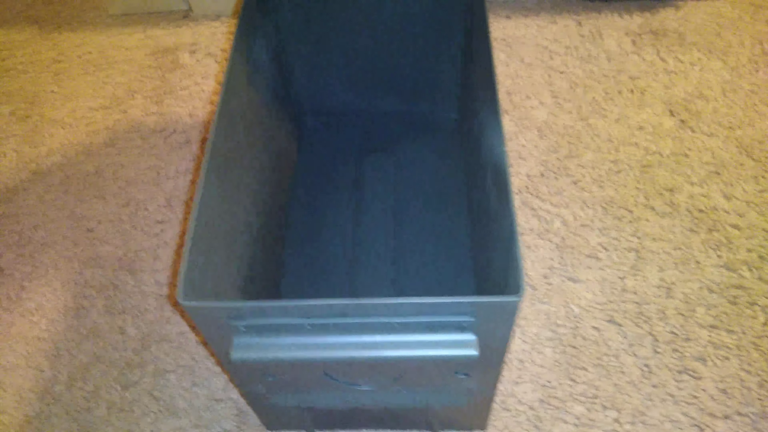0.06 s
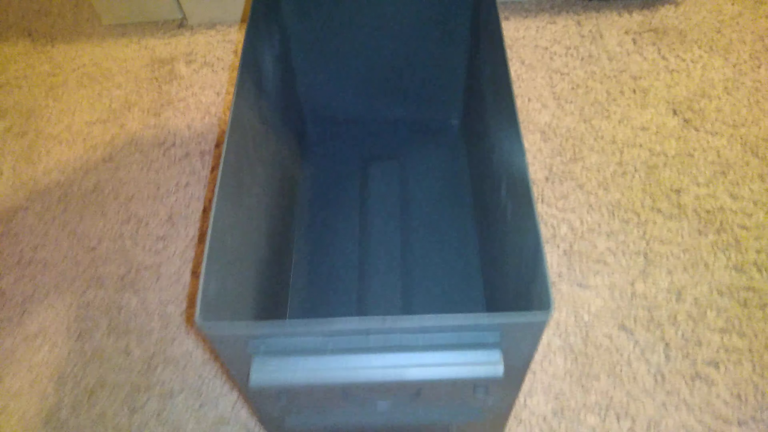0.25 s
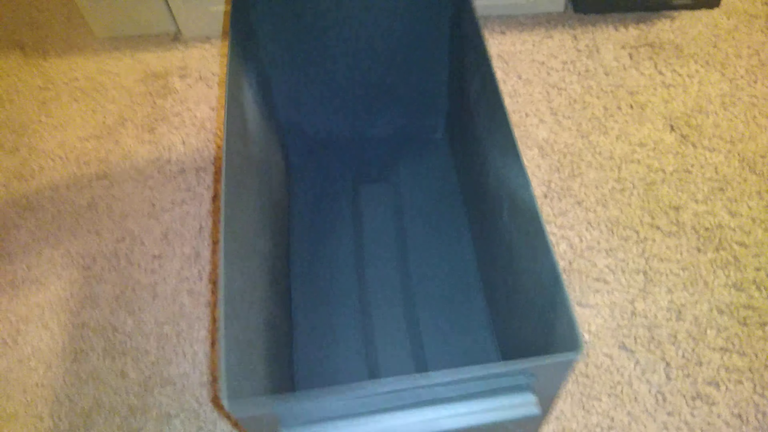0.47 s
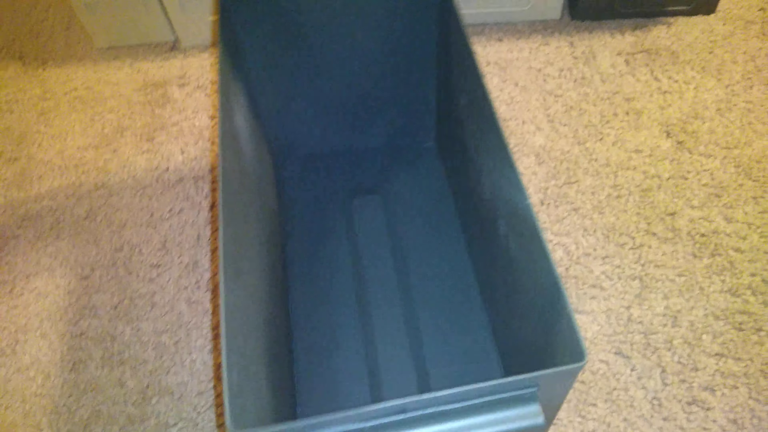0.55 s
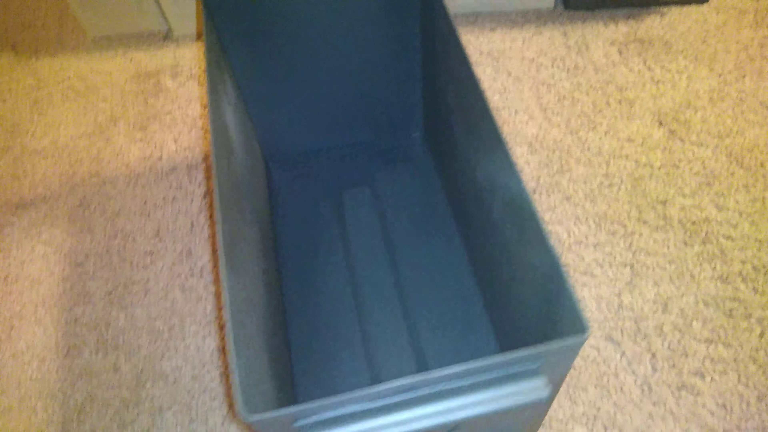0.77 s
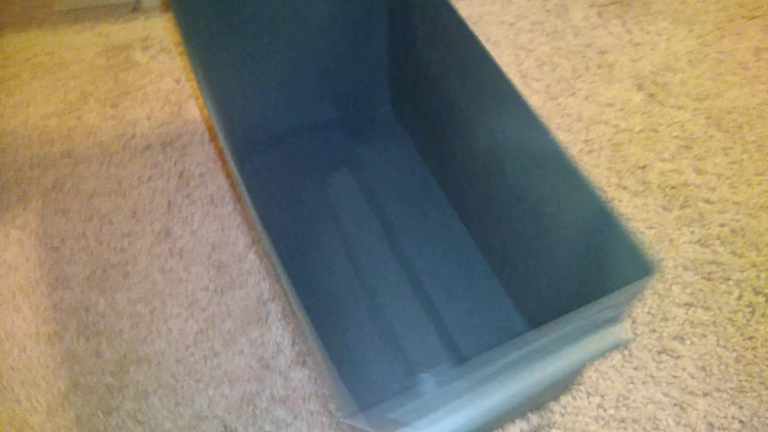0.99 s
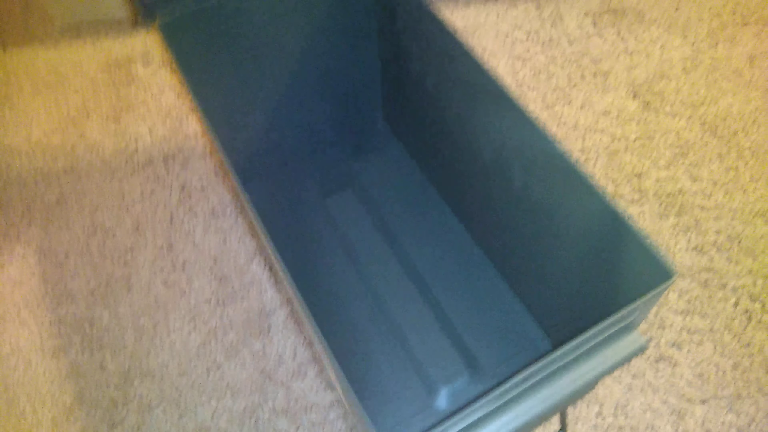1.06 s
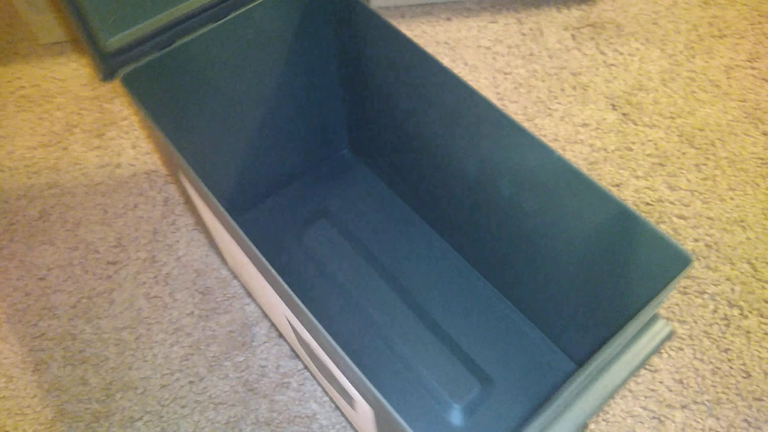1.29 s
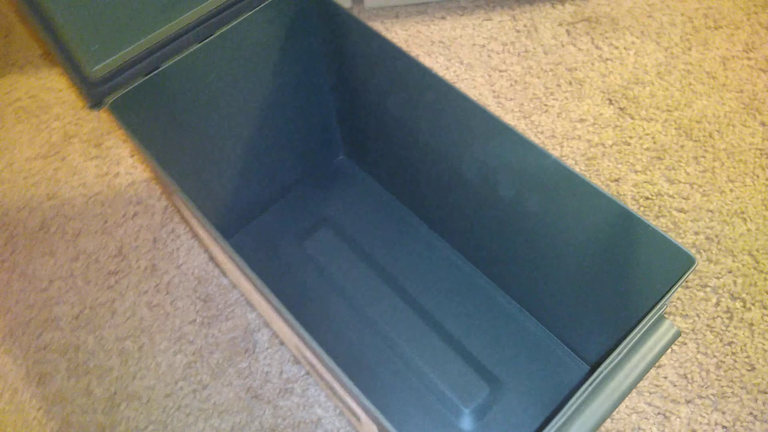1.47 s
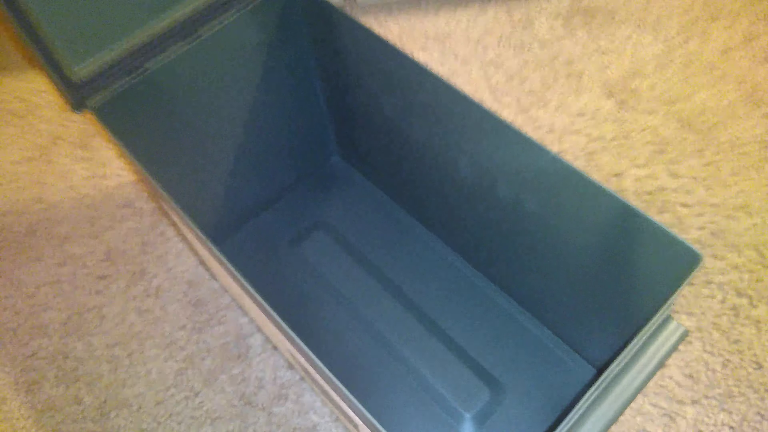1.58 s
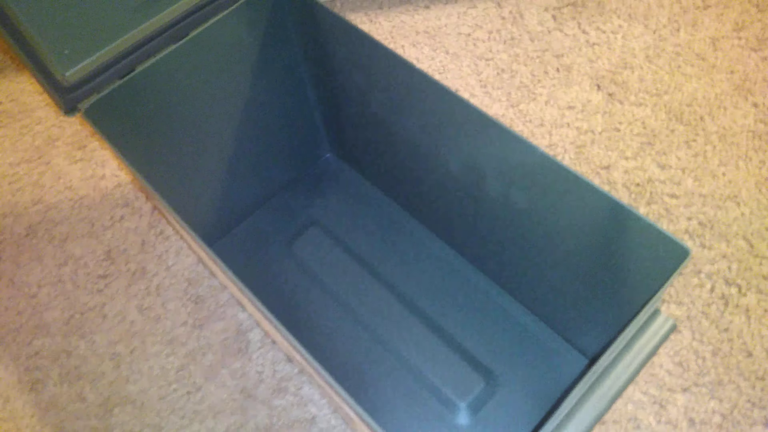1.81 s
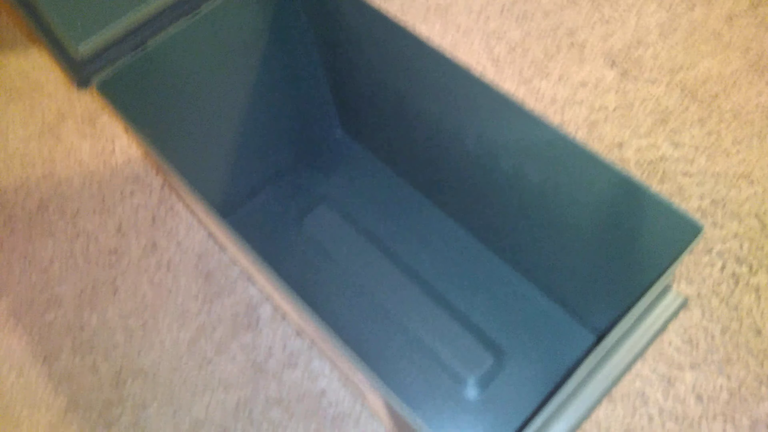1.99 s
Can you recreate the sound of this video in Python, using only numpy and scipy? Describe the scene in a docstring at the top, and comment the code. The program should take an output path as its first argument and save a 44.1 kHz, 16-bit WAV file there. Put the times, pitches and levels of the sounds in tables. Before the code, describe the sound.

An open steel ammunition can clanks and rings, its handle slapping and its lid knocking against the hinge. It then slides round on carpet with a soft hiss, a latch clack and a few dull knocks, close up in a quiet room.

```python
"""An open steel ammunition can is grabbed and swung round on a carpet, close to the microphone.
First it clanks and the handle slaps its stop. Each contact is a short chatter that sets the thin
walls ringing. Just after half a second the lid drops against its hinge, and the base starts to
hiss over the carpet as it turns. From one second on, the latch clacks and the base settles with
a few dull knocks. Under it all lie a soft handling rumble and a quiet room."""
import sys
import numpy as np
from scipy import signal
from scipy.fft import irfft, next_fast_len
from scipy.io import wavfile

SR = 44100
rng = np.random.default_rng(int(sys.argv[2]) if len(sys.argv) > 2 else 0)


def log_audio(samples):
    """Write samples as a 16-bit WAV file to the path given in sys.argv[1]."""
    # one column per channel
    frames = np.atleast_2d(samples).T
    # limit to full scale, then quantise
    limited = np.clip(frames, -1, 1)
    pcm = np.round(limited * 32767).astype(np.int16)
    wavfile.write(sys.argv[1], SR, pcm)


N = 90404

# The contacts. Each row: start in seconds, chatter length in ms, then the strength in dB
# of the bass, low middle, upper middle and treble.
CONTACTS = [ (0.002, 11.1, -45.5, -42.5, -38, -55), (0.0785, 13.7, -38, -42.5, -33, -52),
            (0.104, 9.5, -38.5, -31, -60, -79), (0.140, 21, -45, -64, -42, -79),
            (0.1695, 12.2, -40.5, -37, -37.5, -40.5), (0.2005, 4.8, -33, -23.5, -16, -18.5),
            (0.231, 14, -35, -35, -32, -37), (0.2498, 6.8, -23.5, -23, -13, -22.5),
            (0.289, 11.2, -26.5, -32.5, -20.5, -33), (0.305, 4.7, -50, -21, -34, -40),
            (0.321, 1.9, -29, -24, -20, -36.5), (0.389, 8, -39.5, -38.5, -63, -66),
            (0.4425, 6.5, -38, -39.5, -33, -57.5), (0.5458, 7.6, -29.5, -30.5, -20.5, -38.5),
            (0.616, 13.4, -50.5, -43.5, -30.5, -54.5), (0.762, 6.7, -57, -58, -51.5, -81),
            (1.040, 3.6, -45.5, -44.5, -48, -66), (1.081, 2.74, -53, -40, -35.5, -62),
            (1.167, 4.7, -47, -42.5, -48.5, -70), (1.199, 5.5, -41.5, -41.5, -57, -69),
            (1.2082, 2.4, -32.5, -39, -27, -36.5), (1.236, 9, -44, -44.5, -40.5, -53.5),
            (1.552, 3.4, -45.5, -42.5, -56.5, -80), (1.592, 2.4, -42, -42.5, -47, -68),
            (1.605, 1.8, -64, -48, -43, -87), (1.621, 2, -58, -53, -40.5, -74)]
# The centres of those four ranges, in Hz.
RANGE_HZ = [260, 850, 2700, 9000]
ATTACK_S, TYPICAL_CHATTER_MS = 0.00095, 6.7
# The tone of the sheet steel. Each row: frequency in Hz, band level in dB.
STEEL_TONE = [(25, -57.5), (50, -37.5), (110, -30), (170, -24.5), (220, -14), (290, -8), (380, -13),
              (530, -22), (760, -9.5), (980, -14.5), (1250, -5), (1500, -8.5), (2000, -6), (2500, -6.5),
              (3200, -8.5), (4000, -10), (5000, -10), (6300, -8.5), (7800, -14.5), (10000, -4), (13000, -6),
              (16000, -8)]
# How the steel rings on. Each row: frequency in Hz, early level in dB, early ring time in seconds,
# late level in dB, late ring time in seconds. A ring time (t60) is how long a 60 dB fade takes.
STEEL_RING = [(100, -10, 0.1, -7.5, 0.54), (279, -3.5, 0.44, -5.5, 0.21), (740, -2.5, 0.26, -8, 0.4),
              (2597, -16.5, 0.16, -22, 0.54), (4900, -8, 0.17, -17.5, 0.4), (11720, -8, 0.061, -20.5, 0.1)]
# The pitches of the walls' modes, in Hz. A mode is a tone that a part rings at by itself.
WALL_PITCHES = [128, 232, 258, 285, 331, 348, 392, 711, 735, 1061, 1269, 1648, 1737, 1837, 2012, 2092, 2955,
                3129, 3439]
# The same modes, in order. Each row: level in dB, ring time in seconds.
WALL_RING = [(-26, 0.55), (-14, .35), (-12, 0.18), (-10.5, 0.083), (-18, 0.56), (-11.5, .42), (-18, .4),
             (-15, .36), (-10, .22), (-20.5, .22), (-8, 0.13), (-14, 0.17), (-15, .24), (-20, .2),
             (-22, 0.1), (-15, .19), (-16.5, .22), (-20.5, 0.15), (-12, .21)]

# Blows on the handle, lid and base. Each row: start in seconds, strength in dB.
HANDLE_SLAPS = [(0.169, -16.5), (0.2005, 9.5), (0.2498, 10)]
LID_DROPS = [(0.5462, 19.5), (0.616, 11.5)]
BASE_KNOCKS = [(1.04, 4), (1.167, 7.5), (1.552, 12.5), (1.621, 8.5)]
# The modes of each part. Each row: pitch in Hz, level in dB.
HANDLE_TONES = [(4161, -52), (4430, -53), (4635, -48), (4856, -54), (6358, -49), (6605, -56), (7607, -57),
                (8425, -64), (8710, -52), (9044, -59), (9464, -57), (9636, -47), (10191, -56), (10982, -53),
                (11590, -52), (11994, -62), (12382, -56), (12834, -63), (13415, -62), (13991, -61)]
LID_TONES = [(635.2, -74), (974.4, -71), (1292, -75), (1642, -72), (2250, -69), (2853, -81), (3305, -76),
             (3456, -82), (4657, -81), (4834, -86)]
BASE_TONES = [(253.0, -64), (344.5, -61), (425.3, -61), (807.5, -66), (904.4, -78), (1104, -74)]
# How those modes start and fade. Each row: frequency in Hz, extra level in dB, ring time in seconds.
HANDLE_FADE = [(4000, -0.5, 0.19), (6400, 2.5, .24), (9600, 4, 0.3), (11800, 3.5, .21), (12400, 13, .15),
               (14000, 11.5, .12)]
LID_FADE = [(600, 5, 0.49), (2250, 6.5, 0.67), (3300, 6, 0.32), (4797, 17, .33)]
BASE_FADE = [(250, 1.3, 0.16), (436, 1.9, 0.29), (805, 2.8, .22), (1100, 1.2, 0.23)]
# The clacks of the latch. Each row: start in seconds, strength in dB.
LATCH_CLACKS = [(1.0812, -31.5), (1.2089, -19.5), (1.593, -37.5)]
# The modes of the latch. Each row: pitch in Hz, level in dB, ring time in seconds.
LATCH_TONES = [(824, -18, 0.12), (1070, -8.5, 0.017), (2417, 0.5, 0.016), (2980, -0.5, 0.01),
               (3345, -9.5, 0.012)]

# How the dragging and the handling rumble rise and fall. Each row: time in seconds, level in dB.
DRAG_LEVEL = [(0, -69), (.36, -88), (.5, -59.5), (.6, -51), (.69, -60.5), (.76, -68.5), (.93, -66.5),
              (1.02, -57), (1.11, -52), (1.18, -58), (1.25, -66), (1.33, -53), (1.42, -54.5), (1.485, -58),
              (1.52, -71.5), (1.58, -75.5), (1.66, -68), (1.71, -85), (2.05, -93)]
RUMBLE_LEVEL = [(0, -56), (.18, -59), (.28, -51.5), (.45, -59.5), (.7, -60), (.82, -61.5), (1.0, -73),
                (1.1, -62), (1.46, -67), (1.55, -78), (1.8, -83), (1.88, -77), (1.97, -71), (2.05, -77.5)]
# The tone of the carpet, the rumble and the room. Each row: frequency in Hz, band level in dB.
CARPET_TONE = [(60, -25.5), (130, -17.5), (300, -21), (550, -16.5), (1200, -16), (2500, -8.5), (4000, -12),
               (6300, -17), (10000, -8.5), (13000, -5.5), (16000, -6.5)]
RUMBLE_TONE = [(25, -21.5), (45, -13.5), (63, -9), (90, -9.5), (125, -6), (180, -24), (300, -2),
               (550, -14.5), (2200, -12), (5000, -25), (16000, -30.5)]
ROOM_TONE = [(25, -100), (65, -81.5), (125, -82), (300, -89), (600, -96), (2000, -97), (5000, -93.5),
             (12000, -91.5), (16000, -89)]
# How the can and the background reach the two microphones. Each row: frequency in Hz,
# left over right in dB, how alike the sides are from 0 to 1, lead of the left side in radians.
CAN_STEREO = [(100, -1, 0.98, .05), (282.8, 2.5, 0.86, 0.071), (695, 2, 0.98, 0.093),
              (1382, -5.5, 0.3, 0.25), (2290, -5, 0, 1.8), (3180, -6.5, 0.9, 1.246), (5500, 8.5, 1, 1.72),
              (8800, 2.5, 0.4, 0.65), (12900, 3, 1, 1.2)]
BACKGROUND_STEREO = [(100, -0.56, 1, 0.4), (990, -2.3, .7, 0.5), (3000, -3.2, .3, 1),
                     (12000, -1.5, 0.08, 0.79)]
EDGES_HZ = 22 * 2 ** (np.arange(39) / 4)   # noise bands, each a quarter of an octave wide
CENTRES_HZ = np.sqrt(EDGES_HZ[1:] * EDGES_HZ[:-1])


def sheet_clatter():
    """Each contact is a burst of tiny rebounds; the steel's crowded modes ring on after it."""
    bursts = []
    for start, chatter_ms, *_ in CONTACTS:
        age = np.maximum(np.arange(N) / SR - start, 0)
        rise_s = ATTACK_S * (chatter_ms / TYPICAL_CHATTER_MS) ** 0.2   # long scrapes swell more slowly
        rise = 1 - np.exp(-(age / rise_s) ** 2)
        fade = np.exp(-np.minimum(age * 1000 / chatter_ms, 60))
        bursts.append(rise * fade)
    bursts, out = np.array(bursts), 0
    rebounds = from_db(-2 * flutter(per_s=500)) ** 2
    for hz, band in noise_bands(CAN_STEREO, ripple_db=9):
        early_db, early_t60, late_db, late_t60 = at_hz(STEEL_RING, hz)
        drive = contact_strengths(hz) ** 2 @ bursts
        early = from_db(early_db) ** 2 * stored_energy(drive, early_t60)
        late = from_db(late_db) ** 2 * stored_energy(drive, late_t60)
        power = drive * rebounds + early + late
        out = out + from_db(at_hz(STEEL_TONE, hz)[0]) * np.sqrt(power) * band
    return out


def contact_strengths(hz, top_hz=15000, hard_blow_db=-19.5):
    """How hard each contact drives the can at one frequency; soft blows barely reach the top."""
    levels = np.array(CONTACTS)[:, 2:].T
    treble = levels[-1]
    top = treble + np.clip(treble - hard_blow_db, -15, 0)
    table = np.column_stack([RANGE_HZ + [top_hz], np.vstack([levels, top])])
    return from_db(at_hz(table, hz))


def stored_energy(power, t60):
    """The metal takes up energy from the contacts and slowly loses it."""
    kept = from_db(-60 / (t60 * SR)) ** 2
    return signal.lfilter([1000 / (TYPICAL_CHATTER_MS * SR)], [1, -kept], power + 1e-18)


def walls():
    """The box gives a hollow ring at every contact; longer contacts feed it more."""
    starts, chatter_ms = np.array(CONTACTS)[:, :2].T
    feed = np.sqrt(chatter_ms / TYPICAL_CHATTER_MS)
    modes = [(hz, contact_strengths(hz) * feed * from_db(db), t60)
             for hz, (db, t60) in zip(WALL_PITCHES, WALL_RING)]
    return ringing(modes, starts, 2 * ATTACK_S)


def struck_part(hits, tones, fade):
    """The handle, the lid or the base rings with its own modes when it is hit."""
    starts, hit_db = np.transpose(hits)
    pitches, levels = np.transpose(tones)
    extra_db, t60s = at_hz(fade, pitches)
    modes = [(hz, from_db(hit_db + db), t60) for hz, db, t60 in zip(pitches, levels + extra_db, t60s)]
    return ringing(modes, starts, 2 * ATTACK_S)


def latch():
    """The latch gives dry clacks that peak almost at once and die quickly."""
    starts, hit_db = np.transpose(LATCH_CLACKS)
    modes = [(hz, from_db(hit_db + db), t60) for hz, db, t60 in LATCH_TONES]
    return ringing(modes, starts, attack_s=0.00039)


def ringing(modes, starts, attack_s, spread_db=1):
    """Clear tones swell and fade after each blow. Each mode: pitch, gain per blow, ring time."""
    out, swell = 0, np.exp(-1 / (attack_s * SR))
    for hz, gains, t60 in modes:
        balance, alike, lead = at_hz(CAN_STEREO, hz)
        lead += (1 - np.clip(alike, 0, 1)) * rng.standard_normal()   # each mode spreads its own way
        luck, turn = rng.standard_normal((len(starts), 2)).T
        blows = np.zeros(N, complex)
        blows[(starts * SR).astype(int)] = gains * from_db(spread_db * luck) * np.exp(2j * np.pi * turn)
        step = from_db(-60 / (t60 * SR)) * np.exp(2j * np.pi * hz / SR)   # one sample's fade and swing
        ring = signal.lfilter([1 - swell], np.poly([step, swell * step]), blows + 1e-18)
        out = out + pan(balance) * np.real([ring, ring * np.exp(-1j * lead)])
    return out


def carpet_drag():
    """Carpet fibres flick past the steel base in a fine, grainy hiss."""
    grain_db = 0.4 * flutter(per_s=250)
    return from_db(over_time(DRAG_LEVEL) + grain_db) * steady_noise(CARPET_TONE)


def handling_rumble():
    """The can and the hands rumble softly as they move."""
    return from_db(over_time(RUMBLE_LEVEL)) * steady_noise(RUMBLE_TONE)


def steady_noise(tone):
    """Even background noise with the given tone."""
    return sum(from_db(at_hz(tone, hz)[0]) * band for hz, band in noise_bands(BACKGROUND_STEREO))


def noise_bands(stereo, ripple_db=0, spacing_hz=84.42):
    """Gives each band's centre and stereo noise; ripple adds peaks, like modes of uneven strength."""
    size = next_fast_len(N, real=True)
    bumps = np.clip(rng.standard_normal(2000), -2, 2)
    bin_hz = np.arange(size // 2) * SR / size
    ripple = from_db(ripple_db * np.interp(bin_hz / spacing_hz, np.arange(len(bumps)), bumps))
    for low, high, hz in zip(EDGES_HZ, EDGES_HZ[1:], CENTRES_HZ):
        balance, alike, lead = at_hz(stereo, hz)
        alike = np.clip(alike, 0, 1)
        first, end = int(low * size / SR), int(high * size / SR)
        left, unrelated = ripple[first:end] * np.exp(2j * np.pi * rng.random((2, end - first)))
        right = alike * np.exp(-1j * lead) * left + np.sqrt(1 - alike ** 2) * unrelated
        bins = np.zeros((2, size // 2 + 1), complex)
        bins[:, first:end] = left, right
        band = irfft(bins, size)[:, :N]
        yield hz, band / band.std() * pan(balance)


def flutter(per_s):
    """A smooth random wobble, about 1 in size."""
    smoothing = signal.butter(2, per_s, fs=SR, output="sos")
    wobble = signal.sosfilt(smoothing, rng.standard_normal(N))
    return wobble / wobble.std()


def pan(db):
    """Left and right gains that keep the total power the same."""
    gains = from_db([[db / 2], [-db / 2]])
    return gains / np.sqrt(np.mean(gains ** 2))


def at_hz(table, hz):
    """Reads a table's columns at a frequency, sliding between rows on an octave scale."""
    row_hz, *columns = np.transpose(table)
    return [np.interp(np.log(hz), np.log(row_hz), column) for column in columns]


def over_time(table):
    """Joins a table's levels with straight lines, one value per sample."""
    return np.interp(np.arange(N) / SR, *np.transpose(table))


def from_db(db):
    """Turns decibels into a gain."""
    return 10 ** (np.asarray(db) / 20)


def scene():
    """The can, the carpet, the handling and the quiet room together."""
    handle = struck_part(HANDLE_SLAPS, HANDLE_TONES, HANDLE_FADE)
    lid = struck_part(LID_DROPS, LID_TONES, LID_FADE)
    base = struck_part(BASE_KNOCKS, BASE_TONES, BASE_FADE)
    can = sheet_clatter() + walls() + handle + lid + base + latch()
    return can + carpet_drag() + handling_rumble() + steady_noise(ROOM_TONE)


def record(dry, low_cut_hz=53, high_cut_hz=15800):
    """The microphone drops the deepest bass; the highest treble is cut steeply."""
    low_cut = signal.butter(2, low_cut_hz, "high", fs=SR, output="sos")
    high_cut = signal.ellip(10, .2, 80, high_cut_hz, fs=SR, output="sos")
    return signal.sosfilt(high_cut, signal.sosfilt(low_cut, dry))


dry = scene()
out = record(dry)
log_audio(out)
```